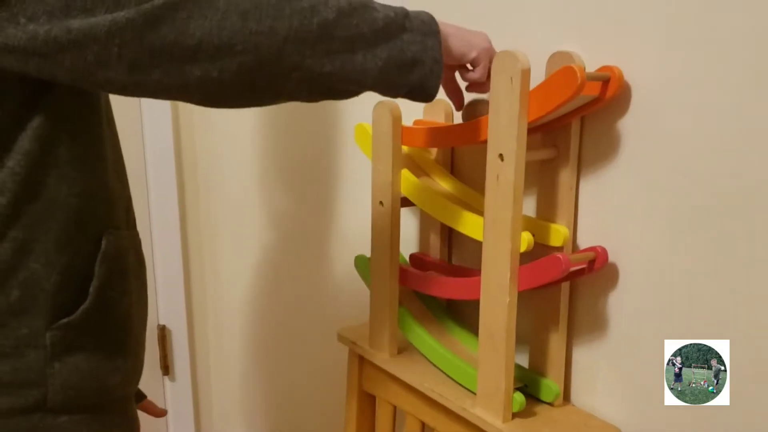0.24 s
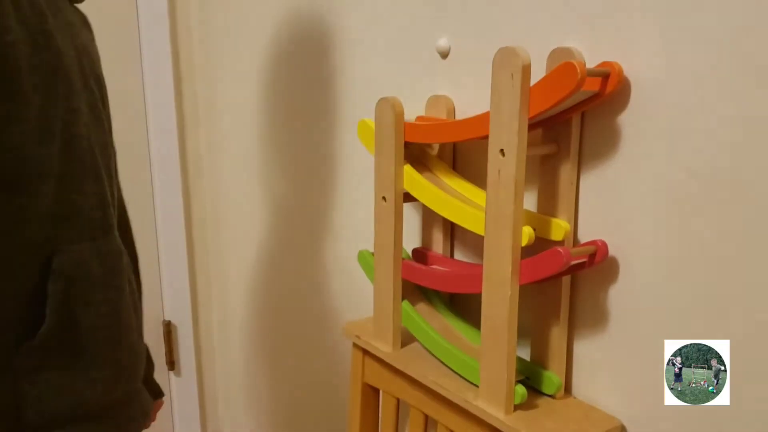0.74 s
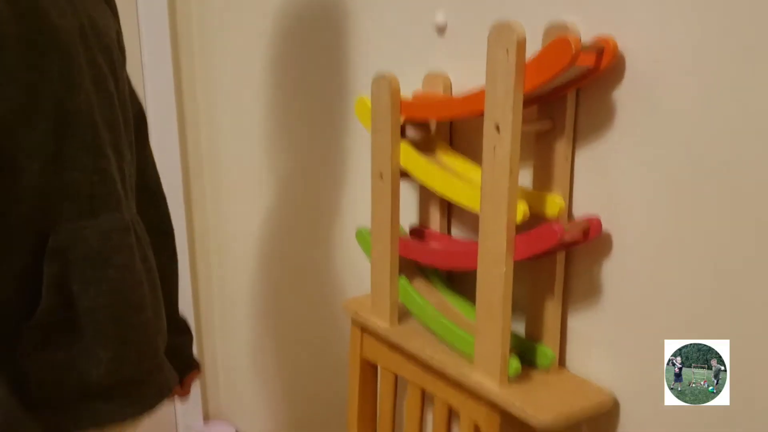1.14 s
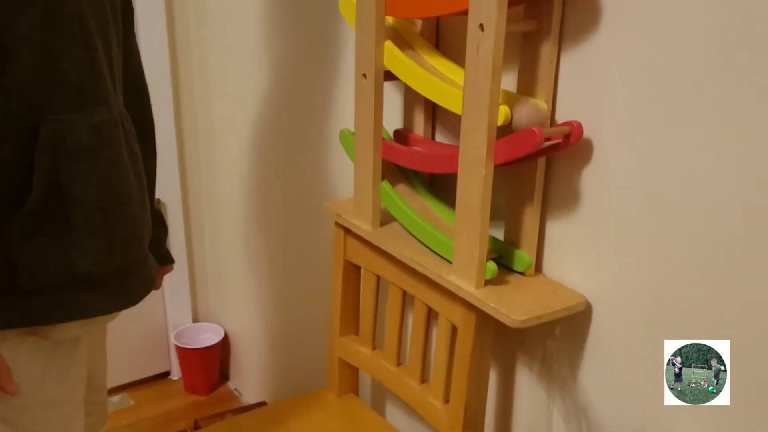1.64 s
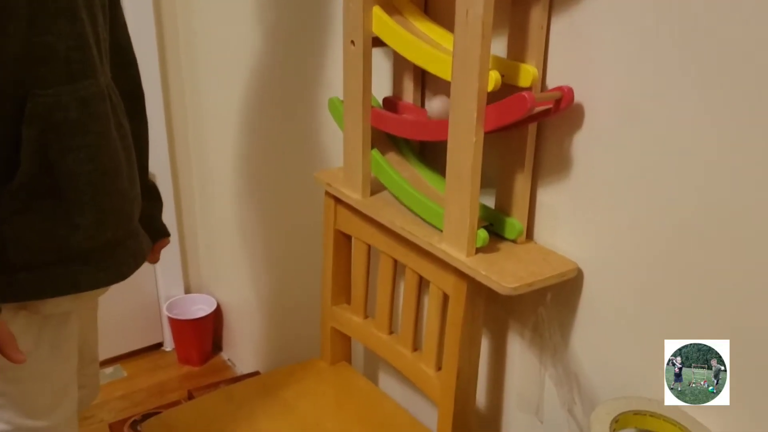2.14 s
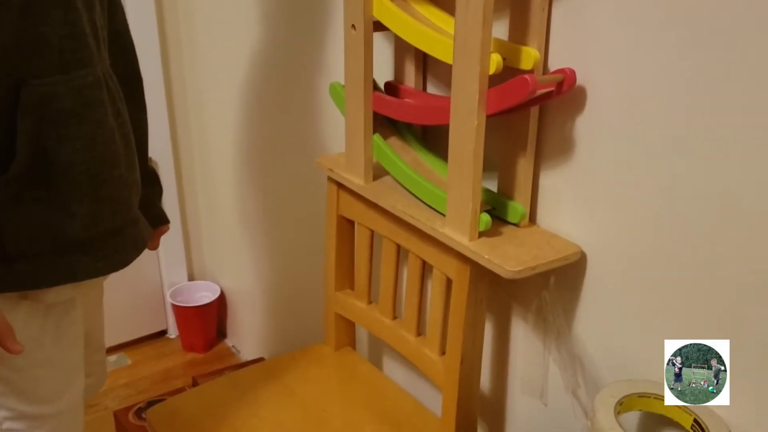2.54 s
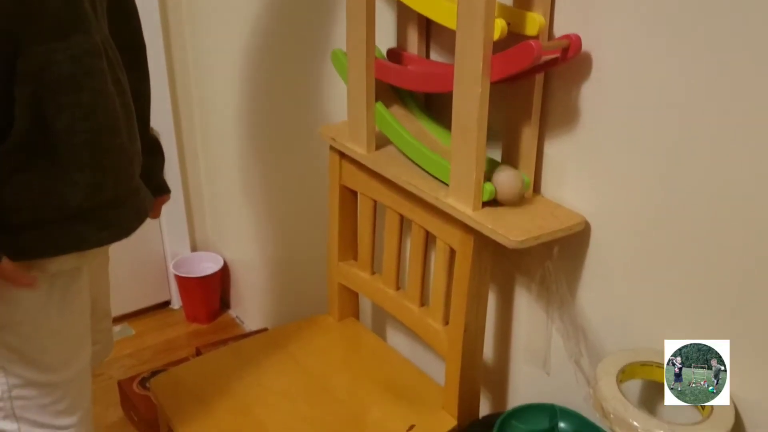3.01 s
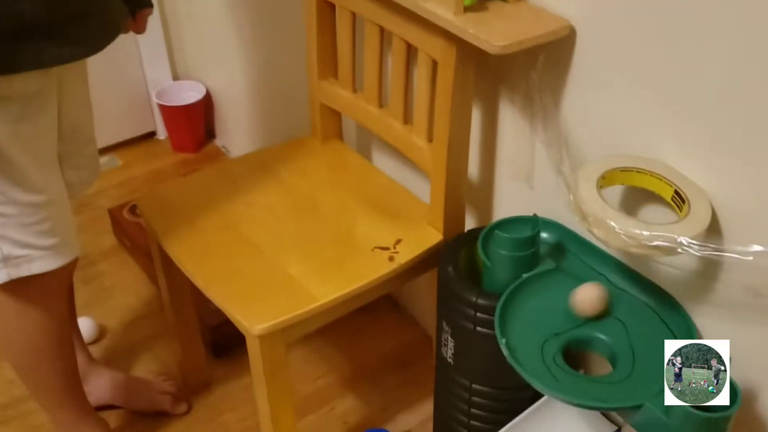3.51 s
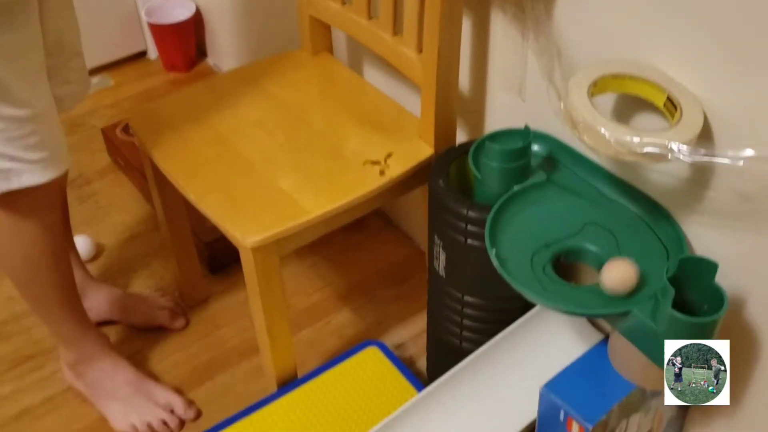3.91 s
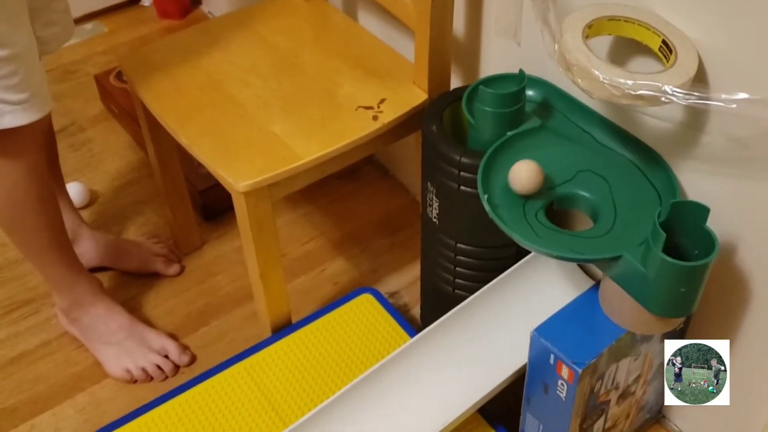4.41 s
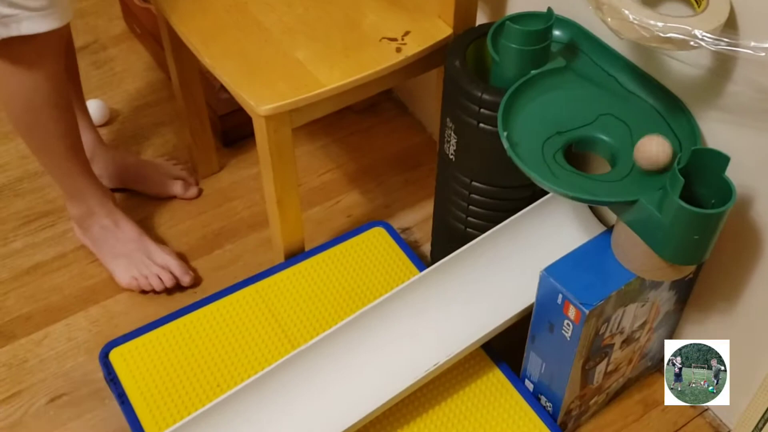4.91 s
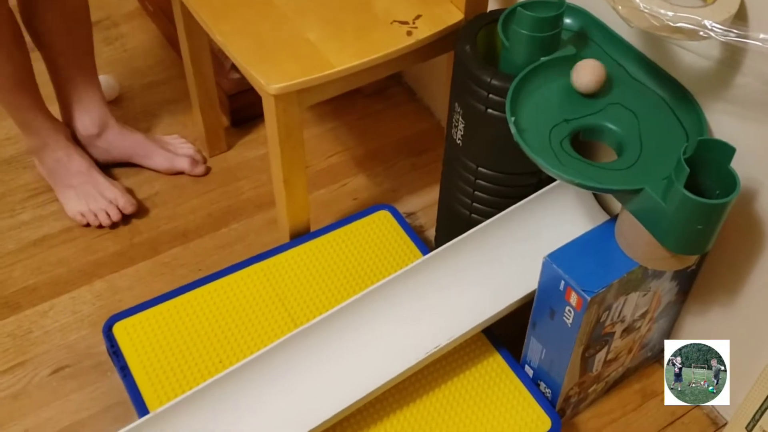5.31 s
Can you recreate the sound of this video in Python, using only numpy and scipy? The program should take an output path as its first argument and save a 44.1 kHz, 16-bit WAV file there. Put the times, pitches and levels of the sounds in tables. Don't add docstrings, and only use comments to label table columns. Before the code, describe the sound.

In a small furnished room with low, quiet air noise, a wooden ball is released onto a wooden ramp toy. At 0.3 s come a few light taps and a brief faint roll. At 0.8 s it lands hard on the second ramp with a bright clack, bouncing faster and softer until about 1.4 s. A sharp landing at 1.56 s starts a longer, brighter clatter on the third ramp, fading into rolling by 2.2 s. At 2.44 s a firm knock hits the lowest ramp, with small bounces and a quick roll. A hard crack at 3.06 s marks the end stop, with a softer rebound. After faint dull touches around 3.3 s, the ball drops into a plastic funnel at 3.5 s with a short hollow knock and light wall taps. From about 3.9 s it circles quietly, a low boom pulsing roughly twice a second among tiny bumps, still rolling at 5.5 s.

```python
import sys
import numpy as np
from scipy import signal
from scipy.fft import rfft, irfft, next_fast_len
from scipy.io import wavfile

SR = 44100
rng = np.random.default_rng(int(sys.argv[2]) if len(sys.argv) > 2 else 0)


def store_wav(level_fs):
    pcm = np.round(np.clip(np.atleast_2d(level_fs), -1, 1) * 32767)
    wavfile.write(sys.argv[1], SR, pcm.T.astype(np.int16))


def decibels_to_gain(level_db):
    exponent = np.asarray(level_db, float) / 20
    return 10 ** exponent


N = 245131

# start_s, pace_db
ROLLING = [
    [(0.296, -28), (0.42, -43.5), (0.5, -75.5), (0.598, -83.5), (0.79, -77)],
    [(1.2, -42), (1.3, -36.5), (1.45, -41), (1.5, -63), (1.55, -82.5)],
    [(1.9, -37), (2.21, -40.5), (2.29, -68), (2.382, -68), (2.389, -52.5), (2.403, -53.5), (2.413, -63.5),
     (2.421, -48), (2.44, -50.5)],
    [(2.58, -25.5), (2.65, -43), (2.74, -51), (2.81, -63), (2.9, -55.5), (3.02, -56), (3.05, -65.5)],
    [(3.14, -22), (3.214, -92), (3.28, -86)],
    [(3.29, -84.5), (3.33, -72.5), (3.345, -54), (3.42, -77.5), (3.49, -105)],
    [(3.52, -28), (3.66, -70.5), (3.86, -48.5)],
]
# blow_thud_db, blow_body_db, blow_tick_db, roll_thud_db, roll_body_db, roll_tick_db
ANSWER = [
    (-23.5, -8, -3.5, 6, 2.5, -1),
    (-21, -9.5, -5.5, 6.5, -6, -15),
    (-20.5, -4, -4, 4.5, 0, -21.5),
    (-20.5, 0.5, -2.5, 8.5, 3, -13.5),
    (-26.5, -12, -34, -16.5, -5.5, -10),
    (-3.5, 2, -10, 19.5, 5.5, -16),
    (-15.5, -1, -12, 1, -1, -14),
    (-19.5, -8.5, -20, 2.5, 5.5, -9),
]
# pitch_hz, width_hz, level_db
SEAT = [(104.2, 24, -6), (129, 26, 1), (247.4, 30, 2.5), (351, 45, -1.5)]
# pitch_hz, level_db (per Hz)
CRACK = [(1760, -7.5), (3000, -3), (4980, -11.5), (5620, -8), (7320, -20.5), (10500, -24), (15500, -22),
         (16500, -38)]
WOOD_BANDS_HZ = [0, 450, 1500, 4500, 20000]
PLASTIC_BANDS_HZ = [0, 290, 600, 1500, 20000]


def evened(x):
    return x / np.sqrt(np.mean(x ** 2) + 1e-20)


def read(points, hz):
    f, value = np.transpose(points)
    return np.interp(np.log(hz + 1), np.log(f + 1), value)


def add(mix, s, sound):
    part = mix[round(s * SR):][:len(sound)]
    part += sound[:len(part)]


def top_ramp():
    # start_s, strength_db, hardness_db, loudest_hz
    top_knocks = [
        (0.2965, -29, 2, 1580),
        (0.3012, -16.5, -2, 2010),
        (0.3088, -20.5, -0.5, 1060),
        (0.3527, -15, -2.5, 1880),
        (0.3769, -25, -8.5, 1070),
    ]
    # pitch_hz, width_hz, level_db
    top_modes = [(520, 100, 4.5), (850, 90, 1), (1060, 54, 10.5), (1618, 120, 6.5), (1785, 59, 2.5),
                 (2376, 63, 6), (3236, 60, -2), (4252, 87, -7), (7140, 110, -4.5)]
    return struck_part(0, top_knocks, top_modes + SEAT, hard=.99)


def second_ramp():
    # start_s, strength_db, hardness_db, loudest_hz
    second_knocks = [
        (0.798, -4, 1.5, 3592),
        (0.9652, -6, 1.5, 3510),
        (1.053, -10, 1, 905),
        (1.1535, -14, 0, 2410),
        (1.225, -16, 0.5, 2330),
        (1.2776, -19, -2.5, 2420),
        (1.3607, -26, -5.5, 1570),
        (1.4196, -29, -10.5, 1160),
    ]
    # pitch_hz, width_hz, level_db
    second_modes = [(521, 50, 2), (940, 55, 6), (1725, 140, 6), (2370, 220, 8.5), (2006, 69, -6.5),
                    (3260, 81, 0.5), (4150, 45, -8), (4280, 220, 2.5), (5050, 150, 3), (3586, 83, 0),
                    (7050, 90, -3), (7700, 79, -1.5)]
    return struck_part(1, second_knocks, second_modes + SEAT, hard=.99)


def third_ramp():
    # start_s, strength_db, hardness_db, loudest_hz
    third_knocks = [(1.557, -6, 1.5, 2150), (1.7318, -7.5, 1.5, 2150), (1.7982, -13, 1.5, 1220),
                    (1.8602, -9.5, 1, 2980), (1.931, -23, 0, 2640), (1.966, -14, 0, 2690),
                    (2.0257, -18.5, -2, 3665), (2.103, -25.5, -5, 3290), (2.156, -24.5, -5.5, 1180),
                    (2.386, -44.5, -9, 1350), (2.4195, -33, -7.5, 1500)]
    # pitch_hz, width_hz, level_db
    third_modes = [(550, 36.7, -5), (679.5, 42, -12.5), (1091, 53, 8.5), (1420, 44.5, 3.5),
                   (1823, 22, -6.5), (2150, 120, -0.5), (2716, 1000, 15.5), (3480, 30, -8), (4521, 100, -1),
                   (4920, 31, -8.5), (5300, 110, -25.5), (6370, 32.2, -6), (7320, 32, -7)]
    return struck_part(2, third_knocks, third_modes + SEAT, hard=.99)


def low_ramp():
    # start_s, strength_db, hardness_db, loudest_hz
    low_knocks = [
        (2.4401, -7.5, 0.5, 931),
        (2.5725, -14.5, -0.5, 931),
        (2.6131, -21, -2, 1430),
        (2.6396, -20, -2.5, 1308),
        (2.74, -40.5, -0.5, 880),
        (2.8677, -50, -4.5, 1516),
        (2.9694, -47, -2.5, 1430),
        (3.0007, -41, 1.5, 794),
    ]
    # pitch_hz, width_hz, level_db
    low_modes = [(545, 39, -5.5), (931, 28, 7), (1067, 46, 10), (1185, 80, 9), (1360, 13, 4.5),
                 (1900, 17, -13.5), (2370, 54, -6), (3250, 110, 1), (3885, 180, -30), (4897, 49, -44.5),
                 (5000, 30, 3), (5833, 85, -0.5), (7020, 21, -3.5)]
    return struck_part(3, low_knocks, low_modes + SEAT, hard=.99)


def end_stop():
    # start_s, strength_db, hardness_db, loudest_hz
    stop_knocks = [
        (3.0583, -3, 5, 2370),
        (3.1304, -11.5, -10, 2370),
    ]
    # pitch_hz, width_hz, level_db
    stop_modes = [(830, 57, 6.5), (1250, 16, -2), (1430, 26, -13.5), (1815, 82.2, 2), (2320, 30, 8),
                  (2358, 75, 5), (2470, 54, 4.5), (3240, 260, -2.5), (3520, 59, -23.5), (3954, 77, -5.5),
                  (5630, 57, -38.5), (6900, 22.8, -26)]
    return struck_part(4, stop_knocks, stop_modes + SEAT, hard=.92)


def ledge():
    # start_s, strength_db, hardness_db, loudest_hz
    ledge_knocks = [
        (3.2842, -34, 3, 150),
        (3.337, -33.5, -1, 180),
    ]
    # pitch_hz, width_hz, level_db
    ledge_modes = [(130, 61, -7), (209, 42, 2.5), (323, 220, -4.5), (520, 100, -11.5), (760, 151, 18.5),
                   (970, 72, -10), (1400, 170, 7), (2150, 300, 3)]
    return struck_part(5, ledge_knocks, ledge_modes, hard=.99, bands_hz=PLASTIC_BANDS_HZ)


def funnel_drop():
    # start_s, strength_db, hardness_db, loudest_hz
    drop_knocks = [
        (3.495, -18, 4.8, 2747),
        (3.507, -8, 1.4, 1747),
    ]
    # start_s, strength_db, hardness_db, loudest_hz
    wall_knocks = [
        (3.6821, -31, -5, 820),
        (3.74, -27.5, 2.5, 736),
        (3.8285, -25.5, 0.5, 2080),
    ]
    # pitch_hz, width_hz, level_db
    drop_modes = [(128.4, 160, -5.5), (201, 24, 5), (315, 117, 12), (410, 22, 5.5), (675, 130, 9),
                  (870, 42, 2.5), (1180, 210, 13), (1500, 29, -13), (1850, 60, -13.5), (2000, 410, 20),
                  (2780, 130, 1.5), (5400, 240, -37), (6910, 160, 4)]
    return struck_part(6, drop_knocks + wall_knocks, drop_modes, hard=.99)


def funnel_circling():
    # start_s, strength_db, hardness_db, loudest_hz
    bumps = [(4.003, -42, 5, 1180), (4.039, -54, 5.5, 2600), (4.125, -37.5, 0.5, 798),
             (4.19, -47.5, -10.5, 356), (4.31, -45, 3.5, 921), (4.467, -46.5, 6.5, 2150),
             (4.67, -55, -13, 735), (4.845, -48, 2.5, 764), (4.941, -53, -1, 786), (5.049, -54.5, 6, 2000),
             (5.487, -61, 6.5, 853)]
    # start_s, pace_db
    circling = [(3.86, -88), (3.95, -64), (4.03, -68), (4.1, -85), (4.15, -76), (4.28, -69), (4.4, -69),
                (4.5, -73), (4.62, -80), (4.75, -71.5), (4.9, -89.5), (5.0, -75.5), (5.1, -75), (5.2, -98),
                (5.28, -86), (5.45, -91), (5.5, -72.5), (5.559, -71)]
    # pitch_hz, width_hz, level_db
    funnel_modes = [(217.4, 5, 10.5), (217.8, 14, 16), (366, 41, 13.5), (531, 53, 8), (867, 65, 10),
                    (1020, 290, 20), (1244, 117, 9), (1500, 170, 9), (1980, 510, -10), (2330, 500, 9),
                    (2960, 310, -24)]
    # top_s, then thud_db, body_db, ring_db, tick_db
    plastic_settle = (0.018, -5, 6, 12, 12)
    answer_db = ANSWER[7]
    near, far = knocks(bumps, funnel_modes, PLASTIC_BANDS_HZ, answer_db[:3], plastic_settle, dull_db=12.0, hard=0)
    rolling = roll(circling, funnel_modes, PLASTIC_BANDS_HZ, answer_db[3:], minor_db=-0.5, hard=0, boom_db=6)
    return near, far, rolling


def struck_part(part, rows, modes, hard, bands_hz=WOOD_BANDS_HZ):
    # top_s, then thud_db, body_db, ring_db, tick_db
    wood_settle = (0.006, -10, 3, 4, -6)
    answer_db = ANSWER[part]
    near, far = knocks(rows, modes, bands_hz, answer_db[:3], wood_settle, dull_db=-1.6, hard=hard)
    rolling = roll(ROLLING[part], modes, bands_hz, answer_db[3:], minor_db=8.0, hard=1)
    return near, far, rolling


def knocks(rows, modes, edges_hz, answer_db, settle, dull_db, hard):
    # thud_db, body_db, tick_db
    hardness_gain = (-0.67, -0.96, 3.32)
    near, far = np.zeros((2, N))
    top_s, *after_db = settle
    for s, ring_db, hardness_db, hz in rows:
        softer_db = dull_db + 0.059 * max(-ring_db - 29.5, 0)
        favoured = (hz, 55 + 150 * (1 - hard) * (hz > 1000), 4)
        bands = rings(modes + [favoured], edges_hz, scatter_db=2.5, detune=0.023,
                      minor_db=7, dull_db=softer_db, hard=hard)
        thud_db, body_db, tick_db = np.add(answer_db, np.multiply(hardness_gain, hardness_db))
        gains = decibels_to_gain(ring_db + np.array([thud_db, body_db, 0, tick_db]))
        straight, spread = gains @ shudder(bands, top_s, after_db)
        add(near, s, straight)
        add(far, s, gains @ bands[1] if round(hard) else spread)
    return near, far


def roll(rows, modes, edges_hz, answer_db, minor_db, hard, boom_db=0):
    # start_s, pitch_hz, level_db
    glide = [(0.3, 1710, -3), (0.4, 1890, -12.5), (0.47, 1160, 5), (0.79, 1200, -1.5), (1.219, 2450, 8),
             (1.31, 2160, -19), (1.362, 1530, -0.5), (1.41, 1470, 0), (1.43, 1150, 7), (1.55, 1140, -16),
             (1.95, 1420, -9.5), (2.25, 1300, -2), (2.385, 1250, 11.5), (2.405, 1450, 13.5),
             (2.421, 1450, 9), (2.44, 1550, 7.5), (2.62, 1430, 4.5), (2.75, 1187, -16.5), (2.87, 1484, 3),
             (3.05, 1450, 2)]
    brisk_db, contacts_per_s = -52, 90
    s, pace_db = np.transpose(rows)
    t = np.arange(s[0], s[-1], 1 / SR)
    patter, touches = np.zeros((4, len(t))), 0
    for spot in range(5):
        sizes = decibels_to_gain(1.8 * np.minimum(rng.exponential(1, len(t)), 4.5))
        contacts = sizes * (rng.random(len(t)) < contacts_per_s / SR)
        contact = rings(modes, edges_hz, scatter_db=3, detune=.035, minor_db=minor_db, dull_db=6, hard=hard)[1]
        patter += signal.oaconvolve(contacts[None], contact, axes=1)[:, :len(t)]
        touches = touches + contacts * (-1) ** spot
    at_s, hz, glide_db = np.transpose(glide)
    tone = evened(resonate(touches, np.interp(t, at_s, hz), width_hz=280))
    tone *= decibels_to_gain(np.interp(t, at_s, glide_db, right=-60))
    thud_db, body_db, tick_db = answer_db
    boom = boom_db * np.cos(2 * np.pi * (t - 4.39) / 0.47)
    faster_db = np.interp(t, s, pace_db) - brisk_db
    levels_db = (thud_db + boom, body_db, 0, tick_db)
    pace_shares = (0.39, 0.61, 1.0, 1)
    sound = decibels_to_gain(brisk_db + 0.76 * faster_db) * tone
    for db, share, band in zip(levels_db, pace_shares, patter):
        sound += decibels_to_gain(brisk_db + db + share * faster_db) * evened(band)
    fades = signal.windows.tukey(len(t), min(0.0097 / (s[-1] - s[0]), 1))
    out = np.zeros(N)
    add(out, s[0], decibels_to_gain(-10.5) * sound * fades)
    return out


def rings(modes, edges_hz, scatter_db, detune, minor_db, dull_db, hard):
    size = 3600
    t = np.arange(size) / SR
    minor = [(hz, 0.3 * hz, minor_db) for hz in np.geomspace(150, 9000, 36)]
    hz, width, db = np.transpose(list(modes) + minor)[:, :, None]
    number = np.arange(len(hz))
    a, b = rng.standard_normal((len(hz), 2, 1)).transpose(1, 0, 2)
    steady = (number[:, None] >= len(modes)) | (hz < 450)
    db = db + scatter_db * np.where(steady, .3, 1) * a
    db = db - dull_db * np.log2(1 + hz / 700)
    decay = np.exp(-np.pi * (0.94 * np.clip(width, 10, 3000) + 0.0045 * hz) * t)
    onset = 1 - np.exp(-t / (0.00019 + 0.0038 * (1 - hard)))
    swing = decibels_to_gain(db) * decay * onset * np.sin(2 * np.pi * (hz * (1 + detune * b) * t + number[:, None] / 2))
    band = np.searchsorted(edges_hz, hz[:, 0]) - 1 == np.arange(4)[:, None]
    beams = (number < len(modes)) * (hz[:, 0] > 450)
    bands = np.array([band, band * decibels_to_gain(-14 * beams)]) @ swing
    hz = np.fft.rfftfreq(size, 1 / SR)
    crack_spectrum = decibels_to_gain(read(CRACK, hz)) * (hz > 2500)
    crack = irfft(rfft(rng.standard_normal(size)) * crack_spectrum)
    crack = evened(crack) * np.exp(-t / 0.0021)
    snap = np.roll(irfft(crack_spectrum), 40)
    snap *= np.linalg.norm(crack) / np.linalg.norm(snap) * np.exp(-t / 0.0033)
    noise = 0.41 * hard * np.array([crack, 0.86 * snap])
    bands[:, 3] = 0.49 * bands[:, 3] / abs(bands[0, 3]).max() + noise
    return bands / abs(bands[0]).max(1, keepdims=True)


def shudder(bands, top_s, after_db):
    u = np.arange(2400) / SR / top_s
    touches = rng.standard_normal(2400) * (rng.random(2400) < 1200 / SR) * np.sqrt(u) * np.exp(-u)
    touches = np.outer(decibels_to_gain(after_db), touches / np.linalg.norm(touches))
    touches[:, 0] = 1
    shaken = signal.fftconvolve(bands, touches[None], axes=2)
    return shaken * (np.linalg.norm(bands, axis=2) / np.linalg.norm(shaken, axis=2))[..., None]


def resonate(x, hz, width_hz):
    turn = np.exp(2j * np.pi * np.cumsum(hz) / SR)
    r = np.exp(-np.pi * width_hz / SR)
    return (turn * signal.lfilter([1], np.convolve([1, -r], [1, -r]), x / turn + 1e-18)).real


def clicks():
    # start_s, peak_db
    edge_hits = [(0.312, -19.5), (0.3555, -24), (0.3772, -31), (1.391, -60), (1.4189, -40.5), (1.4923, -48),
                 (1.5615, -8), (2.4408, -2.5), (3.2927, -41.5), (3.3063, -31), (3.342, -26.5), (3.5086, -3),
                 (4.999, -53)]
    hz = np.fft.rfftfreq(256, 1 / SR)
    step = irfft(1j * hz / (hz + 1489) * decibels_to_gain(0.5 * read(CRACK, hz)))
    click = np.roll(step, 128) * np.hanning(256)
    out = np.zeros(N)
    for s, db in edge_hits:
        add(out, s - 128 / SR, decibels_to_gain(db) * click / abs(click).max())
    return out, decibels_to_gain(-7) * out, 0


def room(x):
    # pitch_hz, t60_s
    decay_times = [(100, 0.16), (300, 0.15), (1000, 0.34), (3000, 0.26), (8000, 0.24), (15000, 0.14)]
    tail = paired(200, 256, lambda hz, t: decibels_to_gain(-60 * t / read(decay_times, hz)))
    tail *= np.clip(np.arange(tail.shape[1]) / SR / 0.0047 - .3, 0, 1)
    tail /= np.sqrt((tail ** 2).sum(1).mean())
    walls = rng.integers(80, 600, 5) + rng.integers(-12, 13, (2, 5))
    tail[[[0], [1]], walls] += .09 * rng.choice([-1., 1.], 5)
    first, last = np.flatnonzero(x)[[0, -1]]
    wet = signal.oaconvolve(x[None, first:last], tail, axes=1)[:, :N - first]
    return np.pad(wet, ((0, 0), (first, N - first - wet.shape[1])))


def hum():
    # pitch_hz, level_db (per Hz)
    house = [(15, -25), (25, 4), (165, 3), (306, 5), (484, 1), (898, -14), (1620, -27), (2570, -30),
             (4640, -33), (9350, -41), (11900, -36), (15600, -35)]
    # start_s, level_db
    swell = [(0, 3.5), (.06, -3.5), (.2, -9.5), (.4, -2.5), (5.56, -2.5)]
    noise = paired(N // 256 + 5, 1024,
                   lambda hz, t: decibels_to_gain(read(house, hz) + np.interp(t, *np.transpose(swell)) * (hz < 6000)))
    return decibels_to_gain(-58) * evened(noise[:, :N])


def paired(frames, size, magnitude):
    # pitch_hz, left-right likeness (-1 to 1)
    likeness = [(100, .98), (420, .9), (650, .2), (1000, -.25), (6000, -.25), (12000, .1)]
    hz = np.fft.rfftfreq(size, 1 / SR)[:, None]
    a, b, c, d = rng.standard_normal((frames, len(hz), 4)).T
    same = np.clip(read(likeness, hz), -1, 1)
    left = a + 1j * b
    right = same * left + np.sqrt(1 - same ** 2) * (c + 1j * d)
    t = np.arange(frames) * size / 4 / SR
    z = np.array([left, right]) * magnitude(hz, t)
    return signal.istft(z, nperseg=size, noverlap=3 * size // 4)[1]


def scene():
    sources = [top_ramp(), second_ramp(), third_ramp(), low_ramp(), end_stop(), ledge(),
               funnel_drop(), funnel_circling(), clicks()]
    mix = hum()
    for near, far, rolling in sources:
        mix = mix + near + rolling + decibels_to_gain(10) * room(far + rolling)
    return mix


def band_limit(x):
    return signal.sosfilt(signal.butter(12, 16980, fs=SR, output="sos"), x)


def record(dry):
    # pitch_hz, left-right_db
    balance = [(60, 5.5), (180, 0.5), (550, 1), (1650, 1.5), (4970, 2), (15000, -1)]
    ceiling = 1.3
    size = next_fast_len(N)
    hz = np.fft.rfftfreq(size, 1 / SR)
    top_cut_db = 28 * np.clip((hz - 15750) / 250 + .5, 0, 1)
    bass_cut = np.sqrt(1 + (60 / (hz + 1)) ** 4)
    response = decibels_to_gain(np.outer([.5, -.5], read(balance, hz)) - top_cut_db) / bass_cut
    bent = ceiling * np.tanh(dry / ceiling)
    mix = irfft(rfft(bent, size) * response, size)[:, :N]
    return band_limit(mix)


dry = scene()
out = record(dry)
store_wav(out)
```